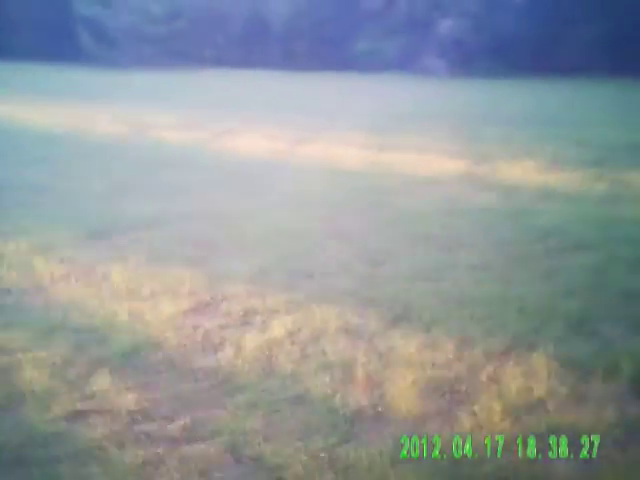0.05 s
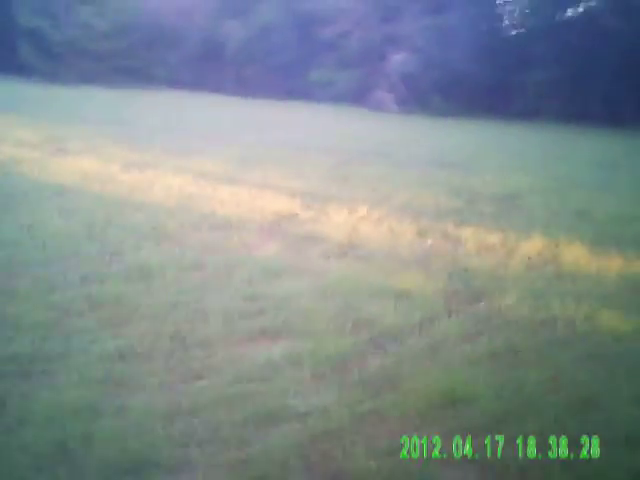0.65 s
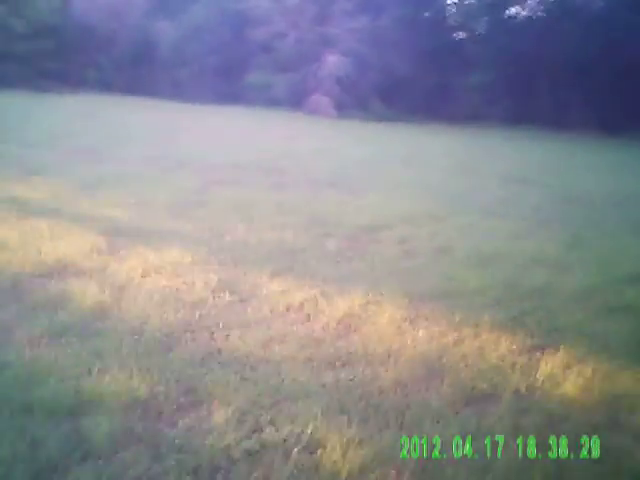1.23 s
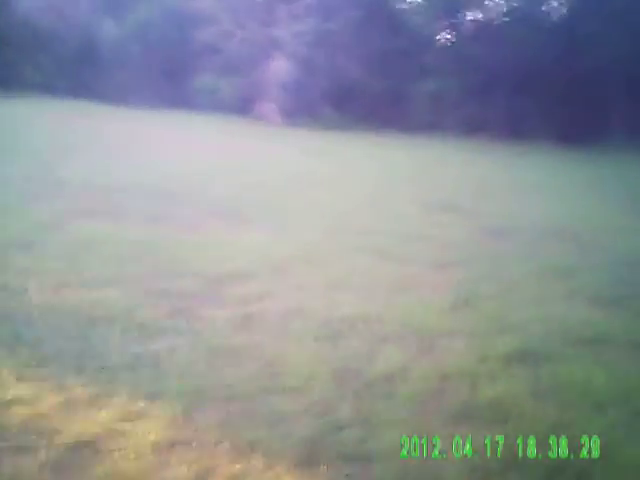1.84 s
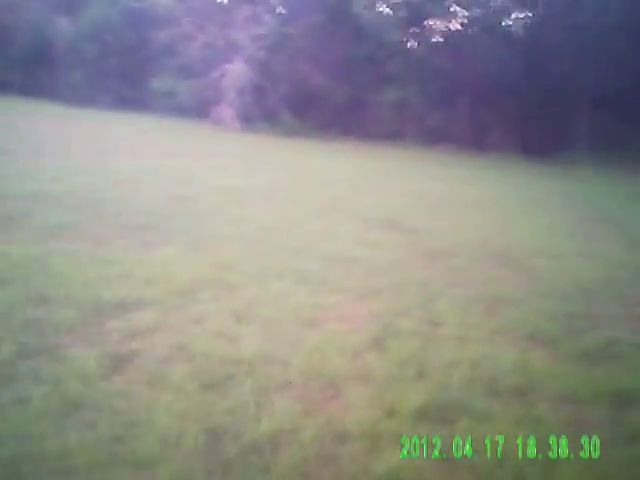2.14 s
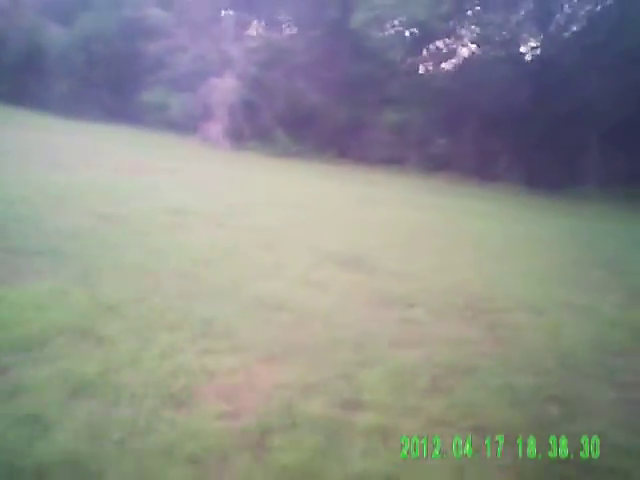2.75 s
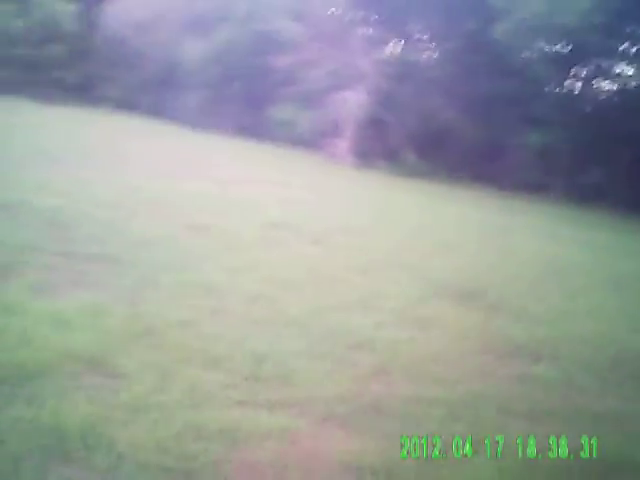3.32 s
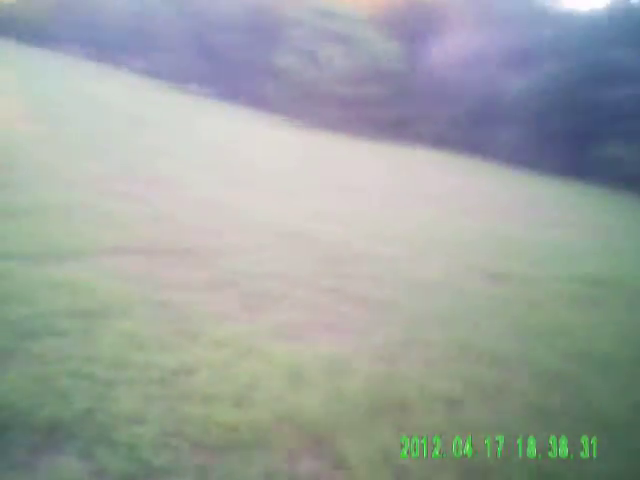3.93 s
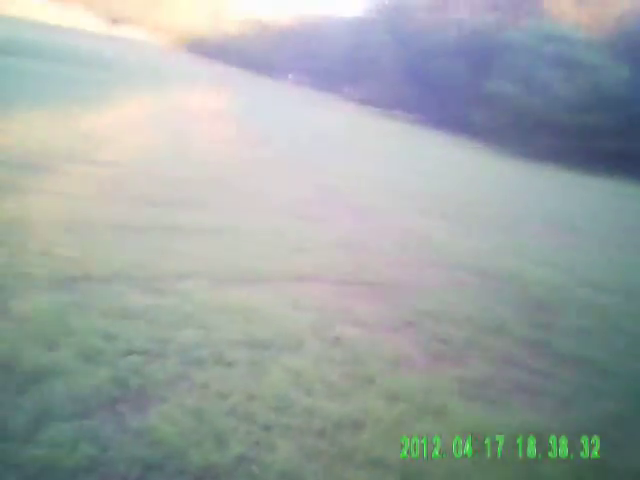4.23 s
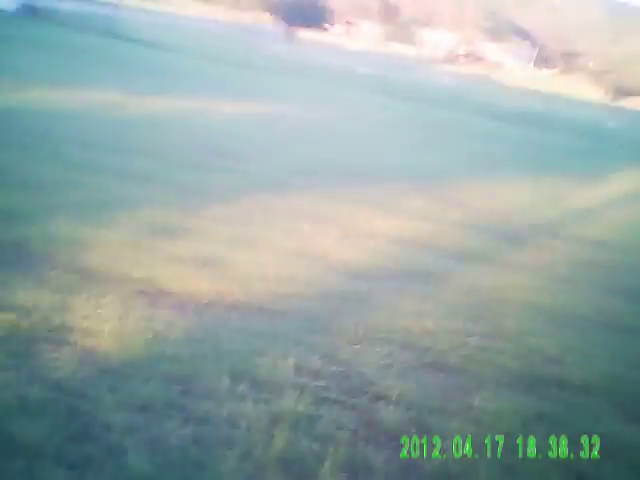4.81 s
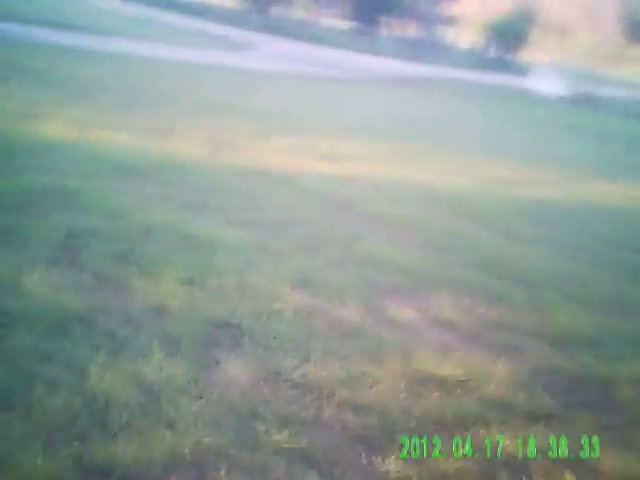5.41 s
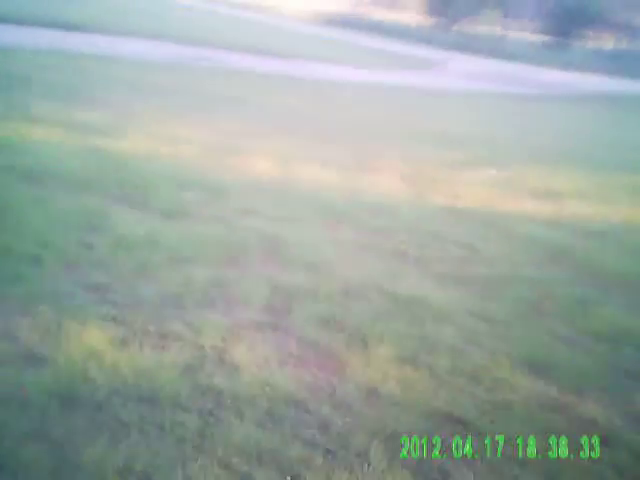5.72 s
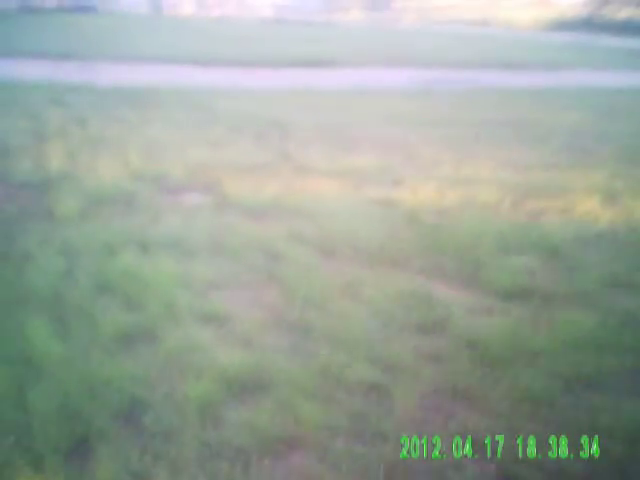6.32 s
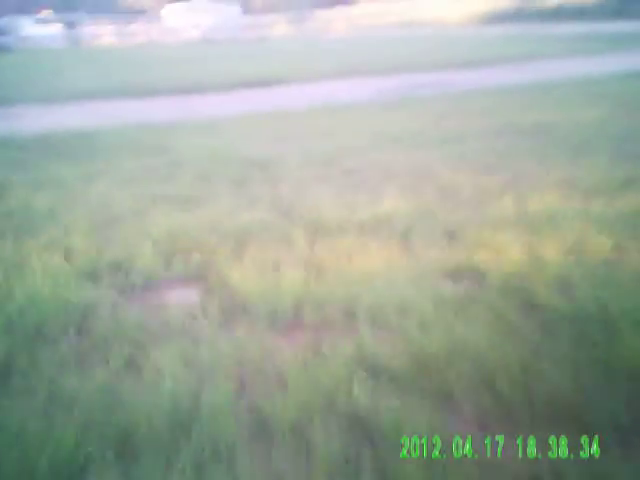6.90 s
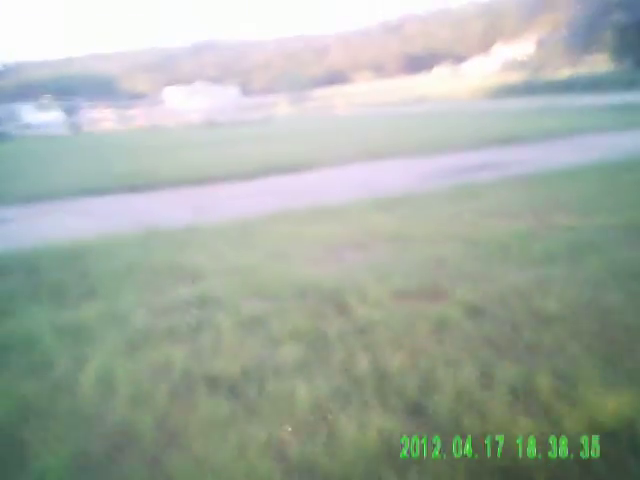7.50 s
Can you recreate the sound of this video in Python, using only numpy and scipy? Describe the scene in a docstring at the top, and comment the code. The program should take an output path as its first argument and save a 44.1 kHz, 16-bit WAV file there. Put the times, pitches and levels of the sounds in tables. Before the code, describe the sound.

A small model helicopter flies low, its engine and rotors making a steady, harsh, high-pitched buzz, very close and heavily distorted.

```python
"""A hard, rasping buzz: a model helicopter flies low over a field, heard from a tiny camera on its frame.
Each turn of the two-stroke engine knocks the frame; the rotors shake it and the exhaust adds a roar.
Under load the engine slows, its firing blow shortens and a loose rattle comes sooner.
The summed vibration drives the microphone so far past its range that it only flips between two rails."""
import sys
import numpy as np
from scipy.fft import rfft, irfft, next_fast_len
from scipy.io import wavfile
from scipy.ndimage import map_coordinates

SR = 44100
rng = np.random.default_rng(int(sys.argv[2]) if len(sys.argv) > 2 else 0)


def dump_mix(stems):
    """Bounce the given channels to the path in sys.argv[1] as a 16-bit WAV at rate SR."""
    frames = np.atleast_2d(stems).T  # one column per channel
    limited = np.clip(frames, -1, 1)  # hard clip at full scale
    pcm = np.round(limited * 32767).astype(np.int16)
    wavfile.write(sys.argv[1], SR, pcm)


N = 332955
GEAR_RATIO = 8.715  # engine turns per main rotor turn


def engine(phase, rebound_height, rocking):
    """A periodic impact train: firing blow, loose rattle, piston rebound. Rocking shifts their timing."""
    # How hard the engine works. Each row: time in seconds, load from 0 to 1.
    load_points = [(0, 0.34), (.8, 0.33), (1.0, 0.47), (1.3, 0.33), (2.3, 0.25), (2.8, 0.04), (3.7, 0.07),
                   (5.3, 0.23), (5.9, 0.07), (6.15, 0.64), (6.55, 0.97), (7.05, 0.55), (7.55, 0.16)]
    # The rattle comes and goes. Each row: time in seconds, height above the microphone's flipping point.
    rattle_points = [(0, -1), (.8, -2.2), (1.05, -1), (1.5, -1.7), (3.0, -.9), (3.4, -2.5), (5.2, -2.5),
                     (6.4, -0.05), (7.55, -1.46)]
    load = curve(load_points)
    # in engine turns, from running free to full load
    blow_length = np.interp(load, [0, 1], [0.2677, 0.14])
    rattle_delay = np.interp(load, [0, 1], [0.47, 0.26])
    rebound_delay = np.interp(load, [0, 1], [0.66, 0.642])
    firing = firing_blow(phase - 0.0035 * rocking, blow_length)
    rattle = knock(phase - 0.031 * rocking, rattle_delay, curve(rattle_points))  # loosest, so sways most
    rebound = knock(phase - 0.009 * rocking, rebound_delay, rebound_height)
    return np.max([firing, rattle, rebound], axis=0)


def firing_blow(phase, length, rise_per_turn=79, fall_per_turn=72, crest=1.98):
    """Combustion gives a pressure pulse with steep flanks and a broad top; its width shapes the timbre."""
    since_firing = (phase + .5) % 1 - .5
    flanks = np.minimum(rise_per_turn * since_firing, fall_per_turn * (length - since_firing))
    # the middle of the top caves in once, as the engine nears its top speed
    seconds = np.arange(N) / SR
    middle = 2.26 - 2.01 * np.exp(-((seconds - 2.9) / 0.89) ** 2)
    sag = (crest - middle) * np.exp(-((since_firing - 0.117) / 0.036) ** 2)
    return np.minimum(flanks, crest - sag)


def knock(phase, delay, height, width_turns=0.033):
    """A brief contact makes a parabolic pulse once a turn, delay turns after the firing."""
    offset = (phase - delay + .5) % 1 - .5
    return height - (offset / width_turns) ** 2


def upper_whine(age):
    """A thin whine near 2.7, 2.9 and 4.1 kHz: sines decaying exponentially, age seconds after a firing."""
    # The whine's tones. Each row: frequency in Hz, relative level in dB, seconds to decay by 60 dB.
    tones = [(2690, -9.5, 0.0056), (2912, -5.5, 0.0072), (4116, -12, 0.007)]
    return sum(amp(db - 60 * age / t60) * np.sin(2 * np.pi * hz * age) for hz, db, t60 in tones)


def exhaust_roar():
    """Exhaust and gears radiate broadband noise, strongest in the low and middle frequencies."""
    # The roar's spectrum. Each row: frequency in Hz, relative spectral density in dB.
    spectrum = [(30, -6), (200, 1.5), (800, 1.5), (2000, -1.5), (3500, -9), (6000, -15), (12000, -49.5)]
    return noise(spectrum)


def main_rotor(turns, drift_radians=0.2):
    """Rotary forcing, one jolt a rotor turn: the real part presses on the frame, the imaginary rocks it."""
    # The jolt's harmonics. Each row: multiple of the rotor's speed, relative level in dB.
    harmonics = [(1, -2.5), (2, -2), (3, -6)]
    angle = 2 * np.pi * turns / GEAR_RATIO
    orbit = sum(-amp(db) * np.exp(1j * (k * angle + drift_radians * wobble(4))) for k, db in harmonics)
    return orbit / orbit.real.std()


def drivetrain(turns, tail_ratio=4.718):
    """Rotating unbalance gives tones: tail rotor, its two blades, and engine minus main rotor speed."""
    rotor_turns = turns / GEAR_RATIO
    tail = 2 * np.pi * (tail_ratio * rotor_turns + rng.random())
    beat = 2 * np.pi * (turns - rotor_turns + rng.random())
    return amp(-8.5) * np.cos(tail) + amp(-12) * np.cos(2 * tail) + amp(-6.5) * np.cos(beat)


def steady_hiss():
    """Stationary noise: a faint, steady high hiss under the buzz."""
    # The hiss's spectrum. Each row: frequency in Hz, relative spectral density in dB.
    spectrum = [(20, 7), (1000, 8), (6000, 22), (11000, 8), (13000, -8), (15700, -5)]
    return noise(spectrum)


def amp(db):
    """Decibels to amplitude ratio."""
    return 10 ** (np.asarray(db) / 20)


def curve(points):
    """Linear interpolation of (seconds, value) points, one value per sample."""
    return np.interp(np.arange(N) / SR, *np.transpose(points))


def wobble(rate):
    """A smooth random curve: a spline through rate knots a second."""
    knots = rng.standard_normal(int(N * rate / SR) + 4)
    return map_coordinates(knots, [np.arange(N) * rate / SR])


def filtered(x, response):
    """Linear filtering: the spectrum of x times a response of frequency."""
    size = next_fast_len(N + SR // 4)
    return irfft(rfft(x, size) * response(np.fft.rfftfreq(size, 1 / SR)), size)[:N]


def coloured(x, points):
    """Spectral shaping by (Hz, dB) points joined on a logarithmic frequency axis."""
    point_hz, db = np.transpose(points)
    return filtered(x, lambda hz: amp(np.interp(np.log(hz + 1), np.log(point_hz), db)))


def noise(spectrum):
    """Gaussian noise of rms 1 with the given spectral shape."""
    shaped = coloured(rng.standard_normal(N), spectrum)
    return shaped / np.sqrt(np.mean(shaped ** 2))


def scene(jitter_turns=0.0029):
    """Structure-borne sound: engine, rotors and roar superpose in the frame that carries the camera."""
    # The engine's speed. Each row: time in seconds, turns per second.
    speed_points = [(0.0, 293.4), (0.86, 291.9), (1.3, 293.2), (1.94, 293.1), (2.1, 294.0), (2.26, 293.5),
                    (3.26, 295.1), (3.5, 294.2), (3.8, 294.9), (3.9, 294.2), (4.24, 294.6), (5.06, 294.3),
                    (5.4, 293.3), (6.1, 293.6), (6.4, 290.5), (6.6, 290.0), (6.72, 291.5), (7.55, 293.9)]
    # The piston's rebound. Each row: time in seconds, height above the microphone's flipping point.
    rebound_points = [(0, -0.075), (.55, 0.25), (.78, 1.26), (1.15, -0.14), (1.5, 0.95), (1.95, 0.43),
                      (2.25, 0.69), (2.62, 1.5), (3.1, -0.13), (3.8, -0.41), (4.55, 0.2), (5.3, 0.025),
                      (5.9, 0.053), (6.4, 2.05), (6.9, 1.1), (7.55, 0.23)]
    speed, rebound = curve(speed_points), curve(rebound_points)
    turns = np.cumsum(speed) / SR
    orbit = main_rotor(turns)
    # uneven combustion makes each firing slightly early or late
    phase = turns + jitter_turns * wobble(200)
    knocks = engine(phase, rebound, rocking=orbit.imag)
    shake = amp(-5.5) * orbit.real + drivetrain(turns)
    # whine and roar both grow with a harder rebound
    whine = amp(3.0 * rebound) * upper_whine(age=phase % 1 / speed)
    roar = amp(-0.4 + 0.46 * rebound) * exhaust_roar()
    return (knocks + whine + shake + roar)[None]


def record(dry, swing_db=0.66, low_rail=-0.68, hiss_db=-37, cutoff_hz=15720):
    """Hard clipping: the overloaded microphone flips between two rails whenever its drive passes zero."""
    # The camera's frequency response. Each row: frequency in Hz, gain in dB.
    response = [(20, -0.5), (3000, 0), (8000, -2), (11000, -1), (12000, -4.5), (13000, -11.5), (14000, -14),
                (15700, -17)]
    drive = dry[0]
    slope = np.abs(np.gradient(drive)) + 1e-9
    high_share = np.clip(.5 + drive / slope, 0, 1)  # part of each sample spent on the high rail
    sound = amp(swing_db) * coloured(high_share, response) + amp(hiss_db) * steady_hiss()
    return (low_rail + filtered(sound, lambda hz: hz < cutoff_hz))[None]


dry = scene()
out = record(dry)
dump_mix(out)
```